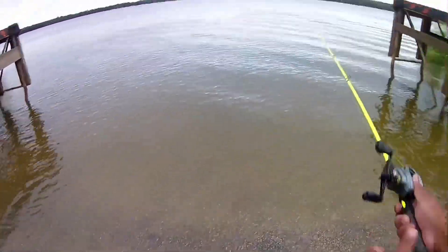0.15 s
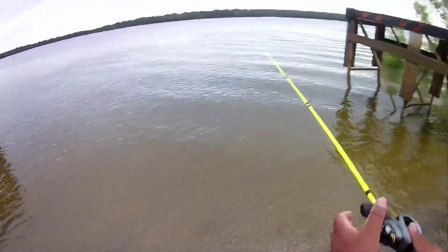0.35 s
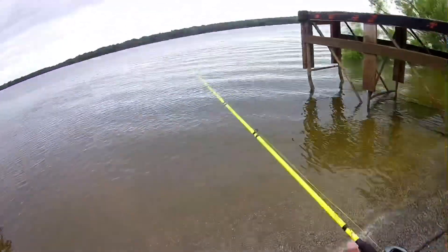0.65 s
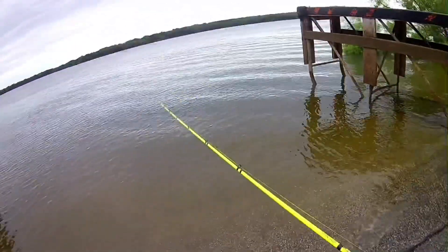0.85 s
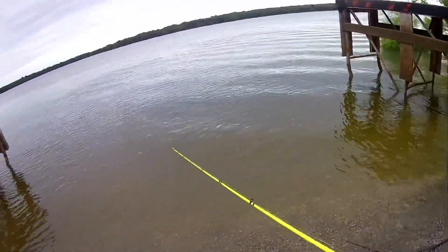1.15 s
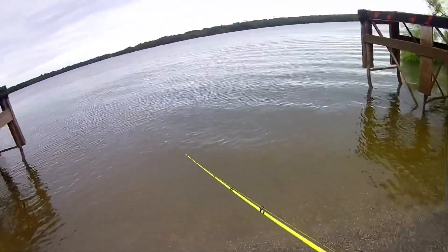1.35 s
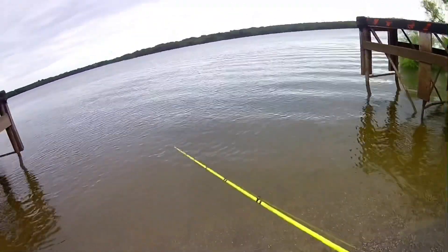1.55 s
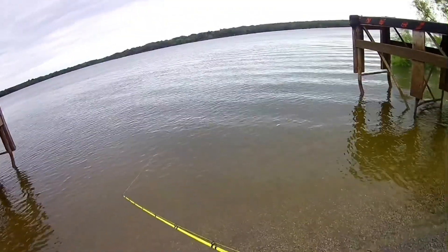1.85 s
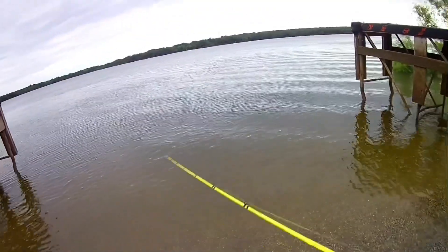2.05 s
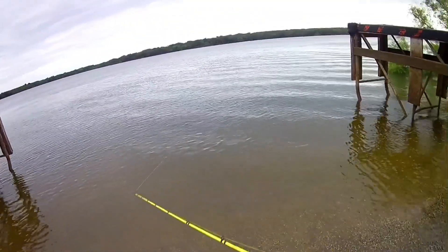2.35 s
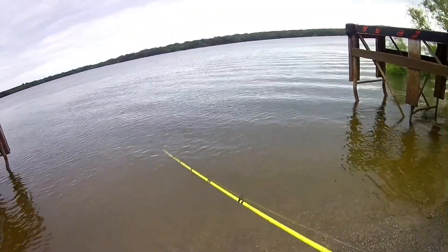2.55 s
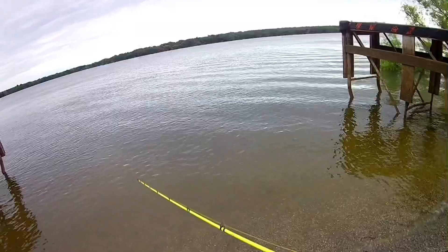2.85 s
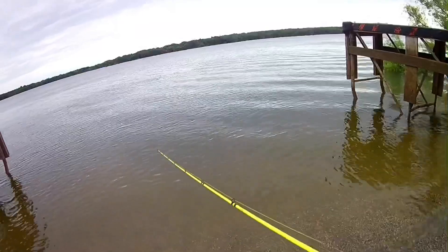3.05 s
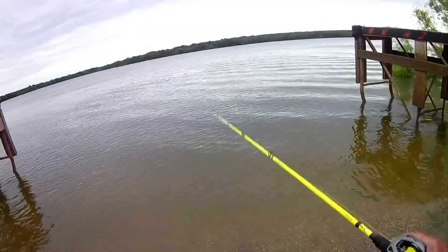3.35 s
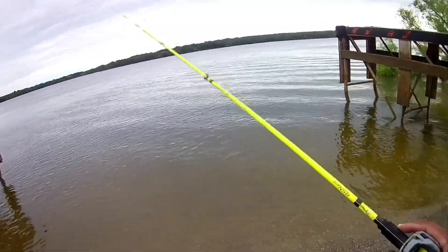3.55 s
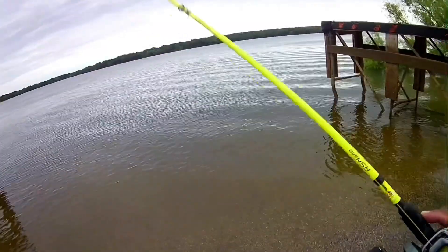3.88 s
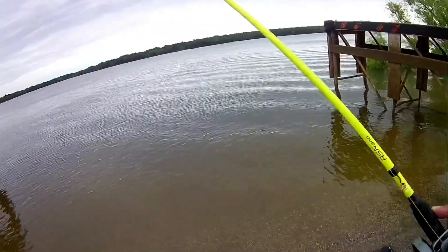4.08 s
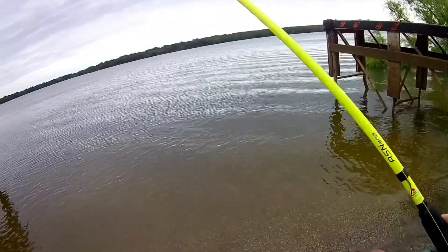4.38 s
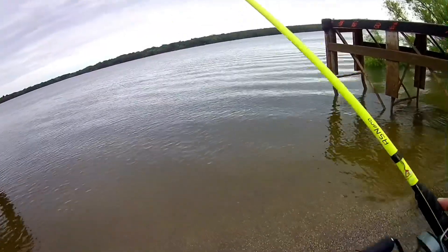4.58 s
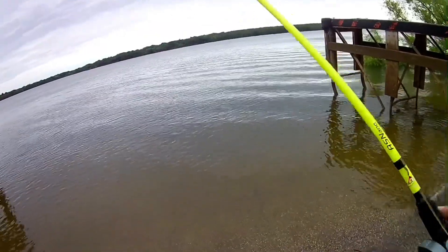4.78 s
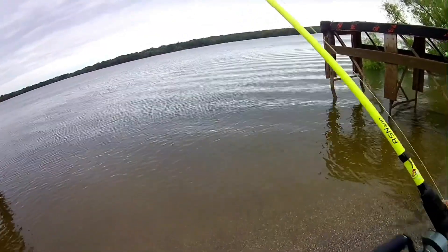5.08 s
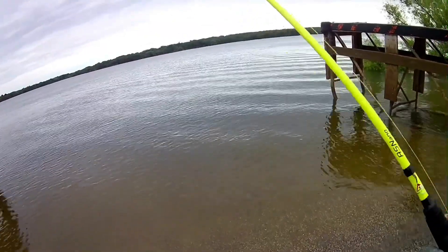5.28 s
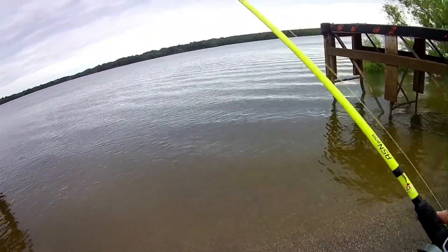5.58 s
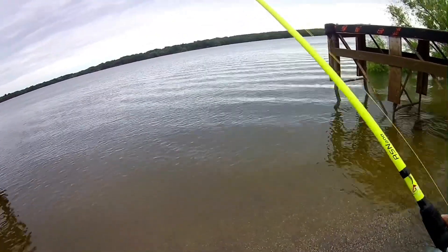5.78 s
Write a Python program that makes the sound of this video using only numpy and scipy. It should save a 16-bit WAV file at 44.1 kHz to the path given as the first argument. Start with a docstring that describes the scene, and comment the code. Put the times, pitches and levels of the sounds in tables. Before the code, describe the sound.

At the edge of an open lake, gentle waves slosh and splash over gravel throughout, with bubbly gurgles and falling droplets. Early on, a fishing reel near the microphone gives a single sharp metallic clack. A few low wind thumps follow and settle into light, gusty rumbling over the faint drone of a far motor. A very brief high chirp, perhaps a small bird, closes the scene.

```python
"""From the start, small waves lap on a gravel lake shore: their trapped air gurgles upward in pitch, sloshes,
splashes and drains with a fine fizz, over a low breeze and the drone of a far motor. At 0.6 s an angler's
reel clacks into gear close by, its metal parts ringing. From about 1 s, eddies and gusts of wind thump
and rumble on the microphone while the waves keep coming. At 5.9 s, right at the end, one thin chirp."""
import sys
import numpy as np
from scipy import signal
from scipy.fft import rfft, irfft, next_fast_len
from scipy.io import wavfile
from scipy.ndimage import uniform_filter1d, map_coordinates

SR = 44100
rng = np.random.default_rng(int(sys.argv[2]) if len(sys.argv) > 2 else 0)


def bounce(signal):
    """Save signal as a 16-bit WAV file at the path given by the first command-line argument."""
    frames = np.transpose(np.atleast_2d(signal))
    limited = np.clip(frames, -1, 1)
    pcm = np.round(limited * 32767).astype(np.int16)
    wavfile.write(sys.argv[1], SR, pcm)


N = 261071

# Waves reaching the shore. Each row: break time in seconds, levels of slosh, gulp, splash and fizz in dB,
# run-up in seconds, spill in seconds.
SHORE_WAVES = [(0.093, -41.5, -42, -49, -61, 0.28, 0.047), (0.32, -54, -56, -78, -86, 0.087, 0.092),
               (.74, -42.5, -45.5, -49, -60, 0.16, .15), (1.025, -49, -52.5, -52.5, -69, 0.027, 0.047),
               (1.218, -46.5, -50, -51.5, -66, 0.1, 0.2), (1.483, -44.5, -45, -53, -65.5, 0.05, 0.078),
               (1.9, -48.5, -54, -59.5, -66, 0.12, 0.021), (2.047, -43, -44.5, -46, -58.5, 0.084, 0.17),
               (2.39, -50.5, -50, -53.5, -67, 0.082, 0.23), (2.68, -42.5, -59, -52, -64.5, 0.089, 0.034),
               (2.87, -50.5, -50.5, -52, -67.5, 0.015, 0.077), (3.16, -54, -56.5, -67, -71, 0.09, 0.19),
               (3.329, -47.5, -49.5, -52.5, -65.5, 0.17, 0.25), (3.749, -42, -47, -44.5, -60, 0.08, 0.11),
               (4.39, -43, -43.5, -48, -64.5, 0.081, 0.19), (4.7, -50, -46.5, -56, -66, 0.059, 0.04),
               (4.802, -41, -55, -47.5, -66, 0.025, 0.085), (5.019, -43.5, -49, -52, -66, 0.14, 0.032),
               (5.512, -48.5, -47.5, -54.5, -66.5, 0.12, 0.2), (5.92, -43, -63, -54, -59, 0.02, .05)]
# Tone of the water's layers, dark to bright. Each row: frequency in Hz, relative level in dB.
GULP_EQ = [(170, -37), (240, -7), (300, -3.5), (420, 1), (520, -11), (800, -61)]
SLOSH_EQ = [(280, -29), (400, -4), (500, 1), (750, 1.5), (950, -1.5), (1200, -7.5), (2000, -51)]
SPLASH_EQ = [(650, -19.5), (900, 6.5), (1100, -2), (1600, 1.5), (2000, -7.5), (2800, -33), (4500, -39.5),
             (15000, -63)]
FIZZ_EQ = [(1500, -18.5), (2200, 0.5), (2600, 5.5), (3200, -2.5), (4200, -4), (5700, -8), (7200, -23),
           (10000, -27.5), (15000, -46)]
SPATTER_EQ = [(2500, -13.5), (4000, 3.5), (5800, -2), (7600, -17.5), (12000, -34)]
SPRAY_EQ = [(4000, -16), (9500, -0.5), (14000, -19)]
# Hollows closing under the crests. Each row: start in seconds, starting pitch in Hz, starting level in dB,
# length in seconds, climb in octaves.
AIR_HOLLOWS = [(0.082, 339, -38, 0.097, 0.6), (0.718, 288.4, -40, 0.2, 1.17),
               (2.03, 319, -38.5, 0.23, 1.12), (2.624, 388, -42, 0.13, 1.3),
               (3.707, 283.7, -42.5, .22, 1.35), (4.409, 309.4, -41.5, 0.15, 1.06),
               (4.785, 318.7, -40, 0.21, 0.94)]
# The loudest air pockets. Each row: start in seconds, starting pitch in Hz, level in dB,
# 60 dB decay time in seconds, pitch bend as a fraction (negative falls).
AIR_POCKETS = [(.024, 1260, -31, 0.06, 0.35), (.045, 1094, -23, 0.023, 0.24), (.083, 371, -23, 0.11, 0.34),
               (.697, 304.7, -26.5, 0.2, -0.28), (.791, 710, -22.5, 0.034, 0.34),
               (.834, 663, -29, 0.07, 0.26), (1.229, 647, -28, 0.034, 0.21),
               (1.970, 1660, -34.5, 0.027, 0.0059), (2.000, 1580, -26.5, 0.03, 0.069),
               (2.005, 301, -20, 0.067, 0.25), (2.035, 567, -21, 0.038, 0.15),
               (2.056, 1205, -24.5, 0.062, 0.29), (2.614, 366, -24, .13, 0.5),
               (2.682, 1242, -33.5, 0.055, 0.32), (2.882, 757, -36, 0.18, 0.26),
               (3.343, 725, -27, 0.12, -0.27), (3.437, 599, -31.5, 0.093, 0.97),
               (3.509, 532, -28.5, 0.055, 0.3), (3.641, 474, -32.5, 0.077, 0.18),
               (3.664, 1360, -31.5, 0.024, 0.34), (3.815, 924, -29.5, 0.053, 0.5),
               (3.994, 640, -29, .065, 0.67), (4.340, 1160, -29.5, 0.022, 0.7),
               (4.398, 840, -29, 0.03, 0.35), (4.555, 1154, -31, 0.04, 0.58), (4.785, 1510, -24, 0.02, .1),
               (4.804, 1277, -28.5, 0.033, .3), (4.822, 935, -28, 0.044, 0.14),
               (4.875, 960, -25, 0.039, 0.012), (5.032, 635, -29, .095, 0.86), (5.212, 600, -29, .032, 0.3),
               (5.544, 1170, -32, 0.04, 0.22), (5.601, 783, -31, .06, 0.56), (5.693, 730, -30, 0.04, .4),
               (5.737, 721, -33, 0.098, 0.8)]
# Droplets falling back. Each row: start in seconds, starting pitch in Hz, level in dB.
DROPLETS = [(0.208, 3240, -33.5), (.732, 2440, -40), (1.054, 3640, -43.5), (1.2, 4220, -41),
            (1.679, 2980, -44), (2.121, 4000, -42), (2.267, 3650, -45), (2.320, 2730, -43),
            (2.38, 2880, -45), (2.853, 2330, -43), (3.249, 5470, -43.5), (3.765, 5900, -43),
            (3.795, 3950, -36.5), (4.087, 2740, -44.5), (5.093, 4480, -47), (5.425, 2530, -41.5)]
# Crests landing flat. Each row: start in seconds, level in dB, 60 dB decay time in seconds.
CREST_SLAPS = [(.023, -33, .05), (.791, -35, 0.038), (2.036, -31, 0.05), (2.615, -34.5, 0.05),
               (3.234, -40, 0.063), (3.338, -39, 0.049), (3.546, -36, 0.054), (4.274, -37, 0.026),
               (4.659, -30, 0.039), (4.785, -32, 0.057), (4.945, -36, 0.029), (5.424, -38.5, 0.047)]
# The dull tone of a slap. Each row: frequency in Hz, relative level in dB.
SLAP_EQ = [(220, -17), (450, 8), (800, 3.5), (1600, -5.5), (2200, -23.5), (3500, -21.5), (9000, -63)]
# Contacts in the reel. Each row: start in seconds, relative metal level in dB, knock level in dB,
# pitch of the struck part in Hz.
REEL_HITS = [(.5772, -28, -42, 4000), (0.5828, -3.5, -7, 1900), (.5860, -7, -37, 5000),
             (.6064, -21, -40, 4600), (.6076, -15, -30, 2500)]
# The reel's metal parts. Each row: pitch in Hz, relative level in dB, 60 dB decay time in seconds.
METAL_MODES = [(1265, 1, .008), (2060, -9, .015), (2490, 3, .013), (2980, -10, .018), (3600, 1, .005),
               (4290, 3, .0085), (5200, -7, .012), (5590, -9, .018), (6820, -14, .016), (9000, -29, .02),
               (10180, -26.5, .032)]
# The reel's frame. Each row: pitch in Hz, 60 dB decay time in seconds.
FRAME_MODES = [(630, 0.013), (880, 0.0098)]
# Tone of the reel's case. Each row: frequency in Hz, relative level in dB.
CASE_EQ = [(200, -46), (400, -13), (700, 14), (1700, -3.5), (2500, 3.5), (4400, 0), (5600, -5.5),
           (7200, -18), (11000, -17.5), (13000, -34.5)]
# Gusts on the microphone. Each row: peak time in seconds, level in dB, half width in seconds.
WIND_GUSTS = [(1.27, -42.5, 0.021), (1.62, -44.5, .15), (3.0, -46.5, .1), (4.27, -43.5, 0.086),
              (4.97, -44, .017), (5.6, -46.5, .08)]
# Eddies that thump the microphone. Each row: peak time in seconds, level in dB, pitch in Hz.
WIND_EDDIES = [(.932, -32.5, 55), (1.119, -29.5, 36.15), (1.461, -27, 58.3), (1.86, -32.5, 33)]
# Tone of the wind rumble and of the open air. Each row: frequency in Hz, relative level in dB.
RUMBLE_EQ = [(12, -12.5), (25, 1), (60, 1.5), (90, -3), (130, -11), (250, -24.5), (600, -68.5)]
AIR_EQ = [(30, -17.5), (60, 3), (110, 0), (175, -3.5), (210, -6), (500, -24), (2000, -26.5), (8000, -57),
          (15000, -66)]
# The far motor's hum. Each row: pitch in Hz, level in dB.
MOTOR_TONES = [(57.5, -51), (136, -55.5), (170, -64)]

# Big pockets come late and go first, the finest bubbles last longest.
# Each fade: swell over the run-up in dB, sag during the spill in dB/s, fall afterwards in dB/s.
GULP_FADE, SLOSH_FADE = (20, 44, 270), (15, 1, 170)
SPLASH_FADE, FIZZ_FADE = (9.6, 18.5, 71), (5.2, 18, 55)


def waves():
    """Big pockets gulp under the crest, smaller ones slosh and splash, the finest fizz among the stones."""
    _, slosh_db, gulp_db, splash_db, fizz_db, *_ = np.transpose(SHORE_WAVES)
    gulp = froth(GULP_EQ, 244.1, 477, cycles=25.6, count=700)
    slosh = froth(SLOSH_EQ, 438.3, 1062, cycles=41.2, count=1500)
    splash = froth(SPLASH_EQ, 999.5, 2420, cycles=42, count=2200)
    trickle = froth(FIZZ_EQ, 2087, 6470, cycles=28, count=1700, spread_db=5, wash_db=-1)
    trickle = patchy(trickle, depth_db=2.5)
    spatter = froth(SPATTER_EQ, 3400, 6300, cycles=30, count=1300, spread_db=5)
    fizz = unit(amp(3.64 * wobble(24.985)) * trickle)
    crackle = coloured(rng.standard_normal(N) * amp(5 * wobble(690)), SPRAY_EQ)
    return (gulp * lapping(gulp_db, GULP_FADE, ripple_db=-63.5)
            + slosh * lapping(slosh_db, SLOSH_FADE, ripple_db=-56.5)
            + splash * lapping(splash_db, SPLASH_FADE, ripple_db=-64)
            + fizz * lapping(fizz_db, FIZZ_FADE, ripple_db=-75.5)
            + spatter * lapping(fizz_db - 9.5, FIZZ_FADE)  # only waves throw fine drops, not ripples
            + crackle * lapping(splash_db - 38.5, SPLASH_FADE))


def lapping(levels_db, fade, ripple_db=-np.inf):
    """A layer's envelope: each wave swells as it runs up, sags as it spills and dies into the ripples."""
    t = np.arange(N) / SR
    swell, sag, fall = fade
    power = np.full(N, amp(ripple_db) ** 2)
    for (s, *_, run_up, spill), db in zip(SHORE_WAVES, levels_db):
        age = t - s
        lead_in_db = swell * np.maximum(-age / run_up, 0)
        tail_db = sag * np.clip(age, 0, spill) + fall * np.maximum(age - spill, 0)
        power += amp(db - np.minimum(lead_in_db + tail_db, 100)) ** 2
    return np.sqrt(power)


def froth(eq, low_hz, high_hz, cycles, count, spread_db=4.2, wash_db=-6):
    """A swarm of bubbles of random size and strength over a soft wash, at rms 1."""
    jitter, size, strength, life = rng.random((count, 4)).T[:, :, None]
    start = (np.arange(count)[:, None] + 2 * jitter) / count
    hz = low_hz * (high_hz / low_hz) ** size
    t60 = cycles * (.5 + life) / hz  # big bubbles ring longer
    t = np.arange(int(min(t60.max(), .12) * SR)) / SR
    gain = amp(-spread_db * np.log(1 - .93 * strength)) * np.sqrt(hz)  # many faint ones, a few strong
    rings = gain * bubble(t, hz, t60, rise=.34)
    index = (start * N).astype(int) + np.arange(len(t))
    swarm = np.bincount(index.ravel(), rings.ravel(), N)[:N]
    return unit(coloured(swarm, eq) + amp(wash_db) * noise(eq))


def bubble(t, hz, t60, rise):
    """An air pocket swells over a cycle or two, rings, and bends in pitch as it nears the surface."""
    age = t / t60
    bend = 1 + rise * np.minimum(age, 1) / 2
    return np.sin(2 * np.pi * hz * t * bend) * amp(-60 * age) * np.tanh(hz * t) ** 2


def gurgles():
    """A hollow of air shrinks as the crest rolls over it, so its fluttering note climbs ever faster."""
    out = np.zeros(N)
    sag_db, flutter_db = 7, 4
    for s, hz, db, length, climb in AIR_HOLLOWS:
        size = int(length * SR)
        progress = np.arange(size) / size
        pitch = hz * 2 ** (climb * progress ** 1.35) * (1 + .09 * wobble(161.4)[:size])
        flutter = unit(amp(flutter_db * wobble(75)[:size]))
        level = amp(db - sag_db * progress) * flutter * signal.windows.tukey(size, .15)
        add(out, s, level * unit(tone(pitch)))
    return out


def slaps():
    """A crest slapping flat on the shore throws one short, dull spray."""
    return bursts(CREST_SLAPS, attack_s=.0009, eq=SLAP_EQ)


def plops():
    """Single large air pockets shudder in pitch and level as they ring."""
    out, t = np.zeros(N), np.arange(SR // 4) / SR
    for s, hz, db, t60, rise in AIR_POCKETS:
        shudder = .06 * wobble(hz / 2)[:len(t)]
        flutter = unit(amp(2 * np.tanh(wobble(hz / 2)[:len(t)])))
        uneven_t = t + np.cumsum(shudder) / SR
        add(out, s, amp(db) * bubble(uneven_t, hz, t60, rise) * flutter)
    return out


def drips():
    """Each droplet lands with a little splat around its note."""
    out, t = np.zeros(N), np.arange(SR // 4) / SR
    t60, attack_s = .014, .001
    for s, hz, db in DROPLETS:
        add(out, s, amp(db) * bubble(t, hz, t60, rise=.2) * np.tanh(t / attack_s))
    splats = bursts([(s, db - 7, t60) for s, _, db in DROPLETS], attack_s, FIZZ_EQ)
    return out + splats


def reel():
    """The clutch scrapes, snaps in and rebounds: metal rings, the frame knocks and loose parts rattle."""
    out, t = np.zeros(N), np.arange(SR // 10) / SR
    falloff_db_per_octave = 5.5  # parts tuned near the struck one ring most
    onset = 1 - np.exp(-t / .00088)
    for s, metal_db, knock_db, struck_hz in REEL_HITS:
        ring = np.zeros(len(t))
        for hz, db, t60 in METAL_MODES:
            mode_db = db - falloff_db_per_octave * abs(np.log2(hz / struck_hz))
            ring += amp(mode_db - 60 * t / t60) * np.sin(2 * np.pi * (hz * t + rng.random()))
        knock = sum(amp(-60 * t / t60) * np.sin(2 * np.pi * hz * t) for hz, t60 in FRAME_MODES)
        add(out, s, (amp(metal_db - 8) * ring + amp(knock_db) * knock) * onset)
    crack = bursts([(s, db - 19, .007) for s, db, *_ in REEL_HITS], attack_s=.0002, eq=CASE_EQ)
    rattle = bursts([(s, db - 33, .08) for s, db, *_ in REEL_HITS], attack_s=.0011, eq=CASE_EQ)
    return out + crack + rattle


def chirp(peak_s=5.917, hz=5394, db=-42, half_width_s=.012):
    """A thin, wavering chirp, perhaps a small bird on the bank."""
    t = np.arange(N) / SR - peak_s
    pitch = hz * (1 + .015 * wobble(400))
    return amp(db) * np.exp(-(t / half_width_s) ** 2) * tone(pitch)


def wind():
    """Gusts and eddies buffet the microphone over a light breeze and the steady air of the open lake."""
    t = np.arange(N) / SR
    breeze = amp(-49.5 - .2 * t + 2 * wobble(11))  # eases slowly
    gust_power = sum(amp(db) ** 2 * np.exp(-((t - s) / width) ** 2) for s, db, width in WIND_GUSTS)
    thumps = np.zeros(N)
    for s, db, hz in WIND_EDDIES:
        swell = amp(db) * np.exp(-2 * (hz * (t - s)) ** 2)
        thumps += swell * np.sin(2 * np.pi * (hz * t + rng.random()))
    rumble = np.sqrt(breeze ** 2 + gust_power) * noise(RUMBLE_EQ)
    return rumble + thumps + amp(-53) * noise(AIR_EQ)


def motor():
    """A far motor's low tones waver on their way across the water."""
    drift = 1 + .00841 * wobble(2.973)
    return sum(amp(db + 2.4 * wobble(6.6)) * tone(hz * drift) for hz, db in MOTOR_TONES)


def bursts(rows, attack_s, eq):
    """Short sprays of noise. Each row: start in seconds, level in dB, 60 dB decay time in seconds."""
    level, t = np.zeros(N), np.arange(SR // 8) / SR
    for s, db, t60 in rows:
        add(level, s, amp(db - 60 * t / t60) * np.tanh(t / attack_s) ** 2)
    return level * noise(eq)


def patchy(x, depth_db):
    """Make x shimmer with small random patches of gain in time and frequency, at rms 1."""
    spectra = signal.stft(x, nperseg=512)[2]
    patches = uniform_filter1d(rng.standard_normal(spectra.shape), size=7, axis=0)
    patches = uniform_filter1d(patches, size=4, axis=1)
    return unit(signal.istft(spectra * amp(depth_db * unit(patches)))[1][:N])


def noise(eq):
    """Coloured noise of rms 1."""
    return coloured(rng.standard_normal(N), eq)


def coloured(x, eq):
    """x through an EQ curve of (Hz, dB) points on a log axis, at rms 1."""
    points_hz, db = np.transpose(eq)
    return unit(filtered(x, lambda hz: amp(np.interp(np.log(hz + 1), np.log(points_hz), db))))


def filtered(x, response):
    """x through a filter given as gain against frequency."""
    size = next_fast_len(N + SR // 2)
    return irfft(rfft(x, size) * response(np.fft.rfftfreq(size, 1 / SR)), size)[:N]


def tone(pitch):
    """A sine that follows a pitch curve in Hz."""
    return np.sin(2 * np.pi * np.cumsum(pitch) / SR)


def wobble(rate):
    """A smooth random curve, rate knots a second."""
    knots = rng.standard_normal(int(N * rate / SR) + 4)
    return map_coordinates(knots, [np.arange(N) * rate / SR])


def add(track, s, sound):
    """Mix a sound into a track at s seconds."""
    part = track[max(round(s * SR), 0):][:len(sound)]
    part += sound[:len(part)]


def amp(db):
    """Decibels to gain."""
    return 10 ** (np.asarray(db) / 20)


def unit(x):
    """Scale to rms 1."""
    return x / np.sqrt(np.mean(x ** 2) + 1e-20)


def scene():
    """Everything at one microphone in the open air."""
    water = waves() + gurgles() + slaps() + plops() + drips()
    return (water + reel() + chirp() + wind() + motor())[None]


def record(dry):
    """A hard high cut takes off the very top."""
    cutoff_hz = 15700
    return filtered(dry[0], lambda hz: hz < cutoff_hz)[None]


dry = scene()
out = record(dry)
bounce(out)
```